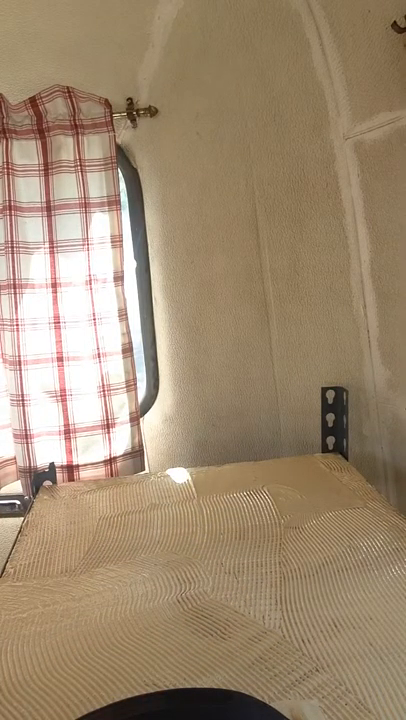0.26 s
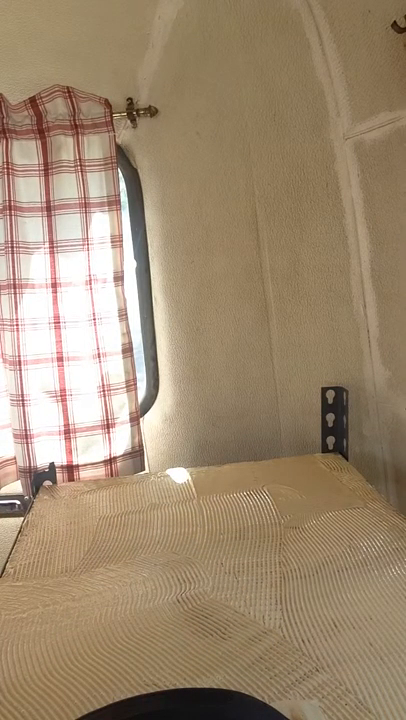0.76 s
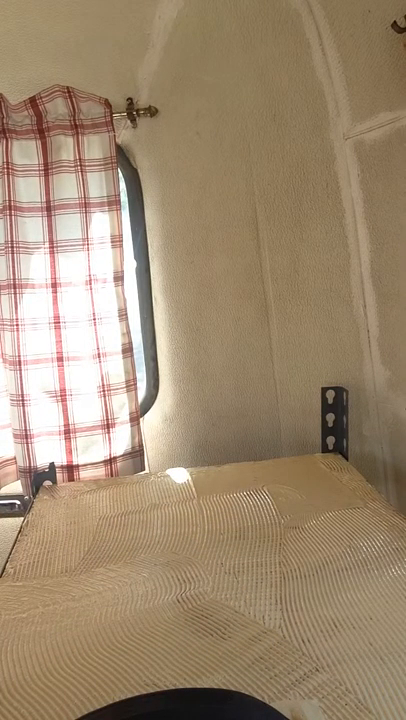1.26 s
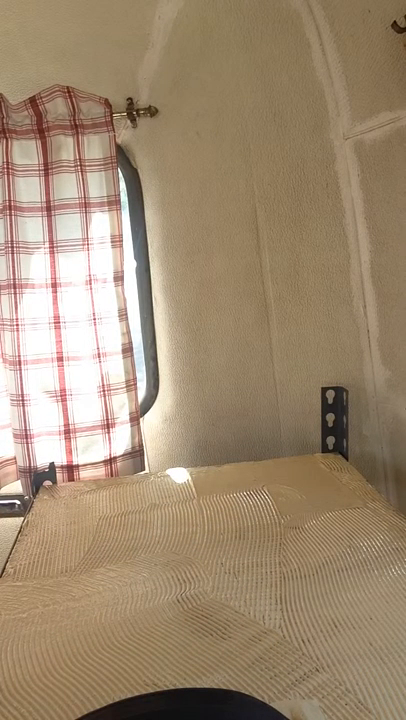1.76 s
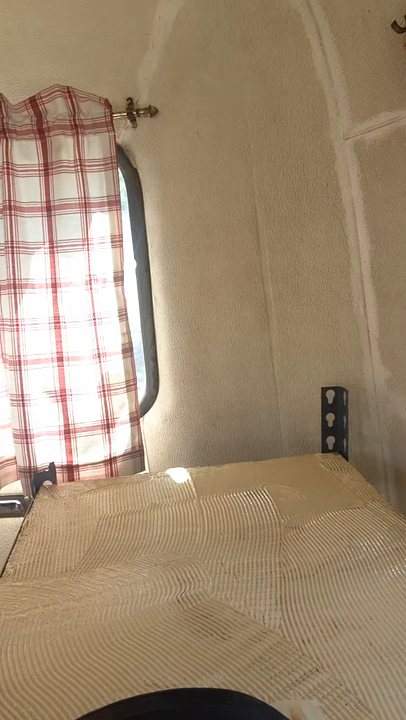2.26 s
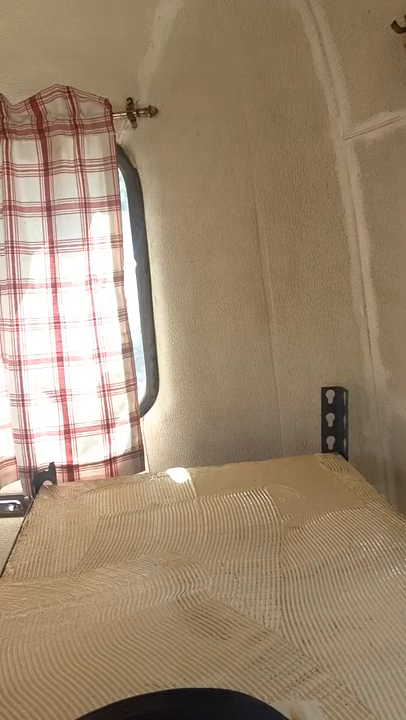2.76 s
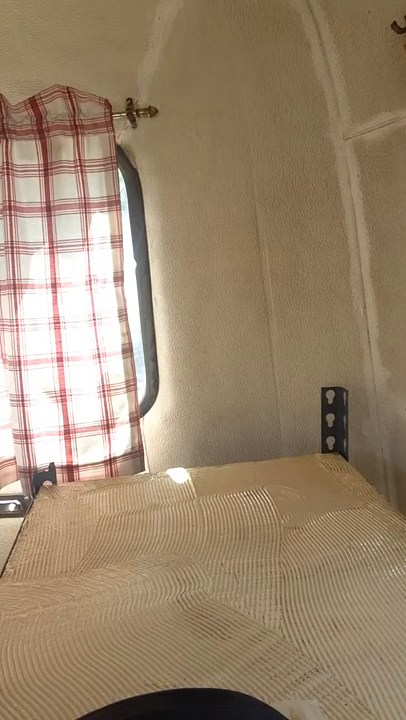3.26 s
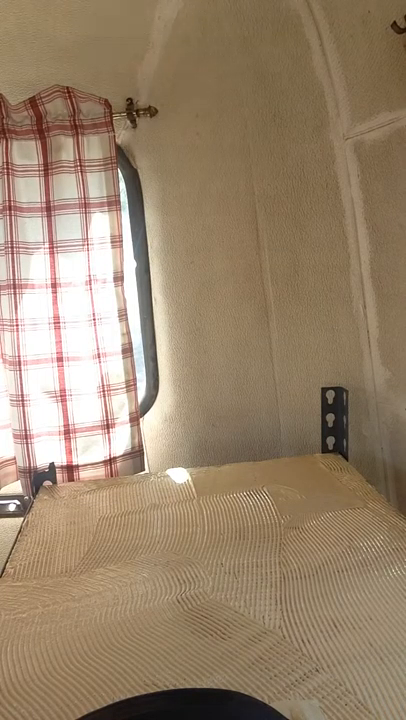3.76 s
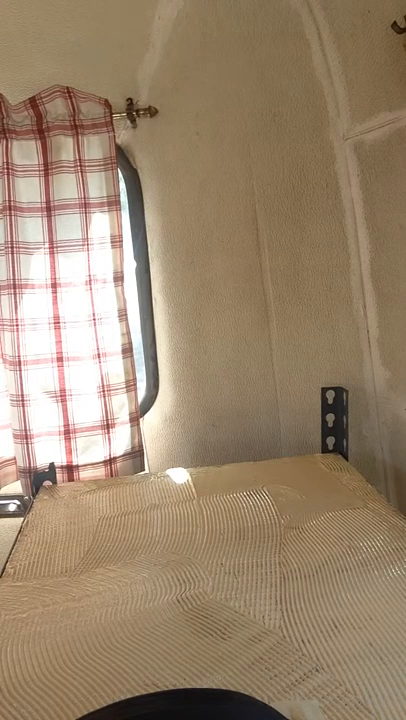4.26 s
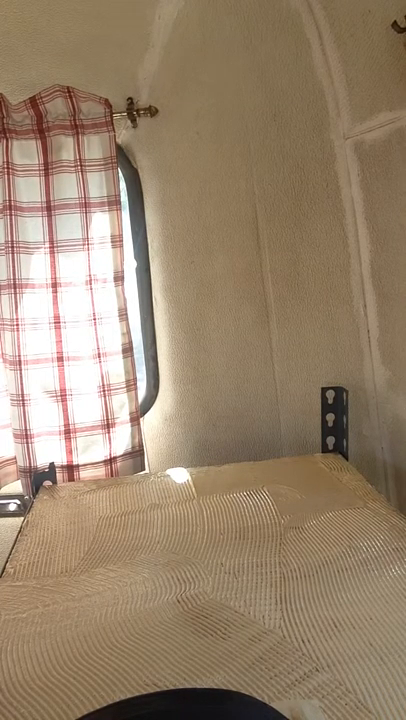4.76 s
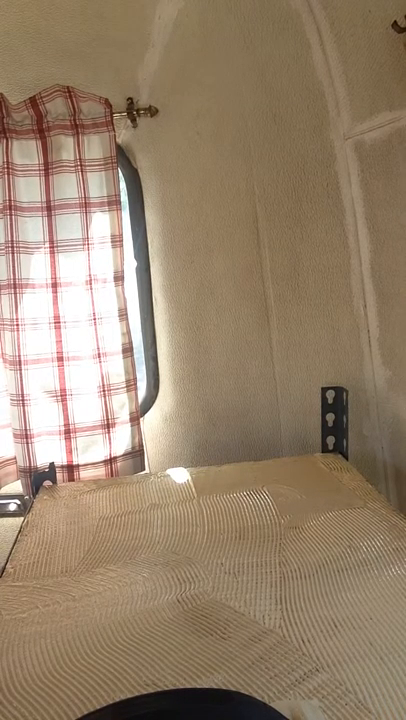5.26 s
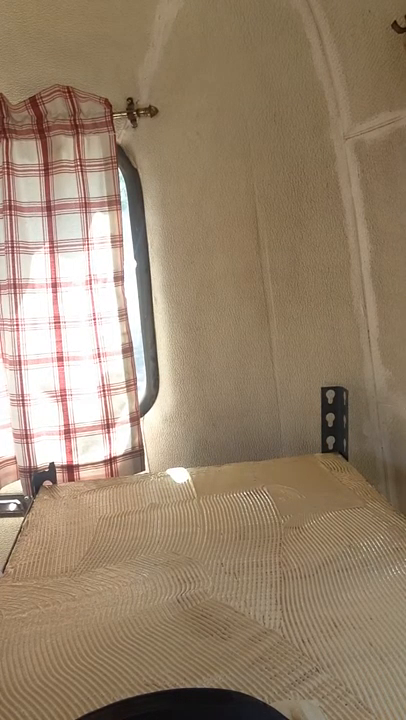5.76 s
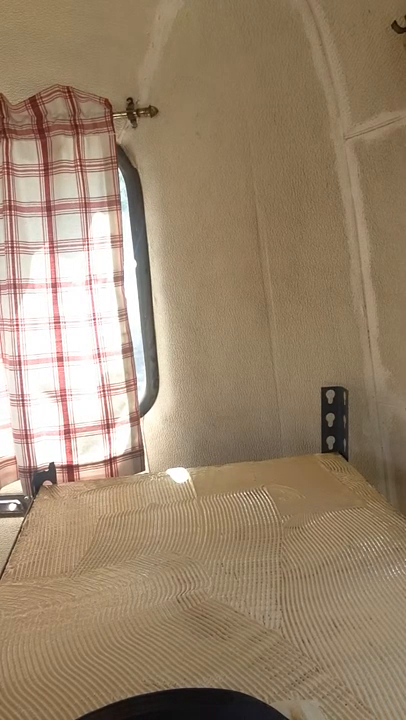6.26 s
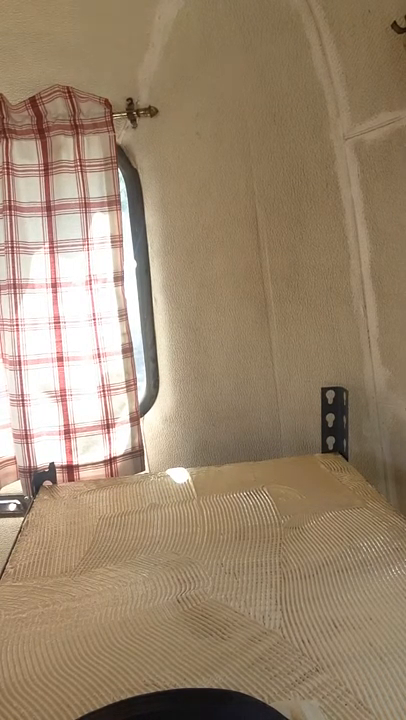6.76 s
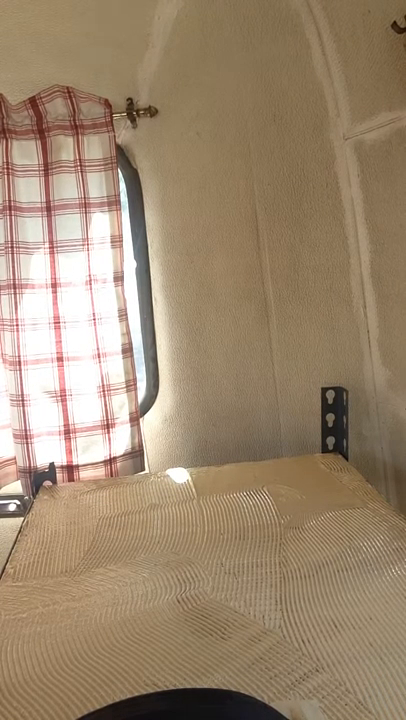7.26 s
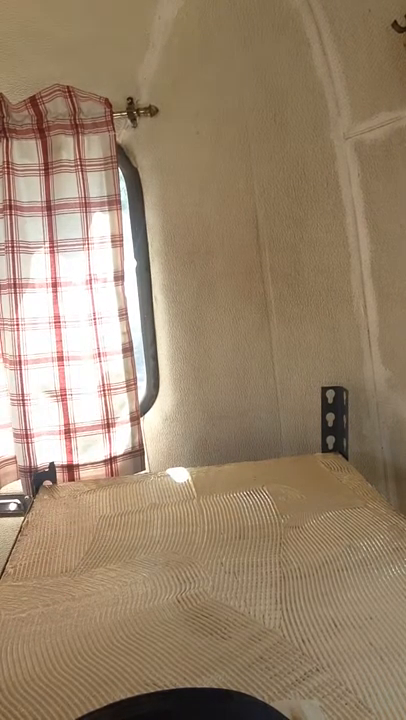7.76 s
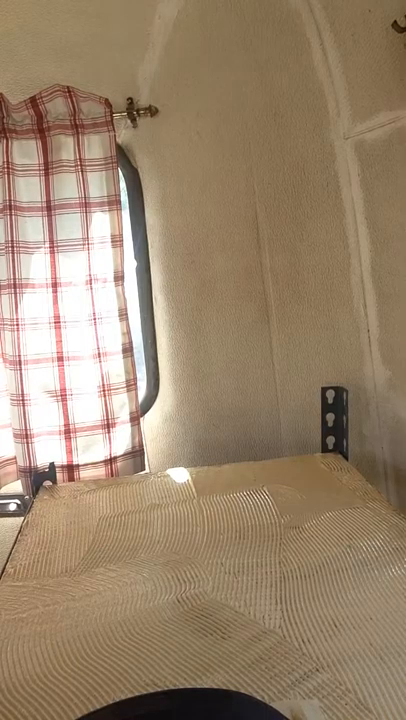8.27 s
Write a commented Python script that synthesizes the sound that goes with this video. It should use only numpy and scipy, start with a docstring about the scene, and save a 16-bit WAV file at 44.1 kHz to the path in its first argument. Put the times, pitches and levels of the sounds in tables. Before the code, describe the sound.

A faint appliance hum and a quiet rumble run throughout inside a small fibreglass cabin. At about 1.4 seconds a small steel part clicks down, followed by a dull double thump at 2 seconds and softer bumps. From 3.1 to 3.3 seconds a board is shoved into place close by, catching and letting go in a loud run of ringing knocks and hollow thuds. Soft rustling of cloth and hands continues from here, with brief scuffs. A thump lands at 4.3 seconds, a tiny tick at 4.6, light rasps around 5 to 6 and another bump at 5.6. The board is shoved again from 6.8 to 7 seconds, in a second loud clatter. A few softer thumps come around 7.5 seconds, then light rustling, and a very faint thin whine sets in at about 8.3 seconds.

```python
"""A board is shoved into place twice, catching and letting go in runs of ringing knocks.
Someone works close by in a small fibreglass cabin: knees and tools thump the floor and ring the shell,
cloth and hands rustle, scuff and rasp, and a small steel part clicks down. Underneath, an appliance
hums at twice the mains frequency over a quiet rumble; a faint whine sets in near the end."""
import sys
import numpy as np
from scipy import signal
from scipy.fft import rfft, irfft, next_fast_len
from scipy.io import wavfile
from scipy.ndimage import uniform_filter1d, map_coordinates

SR = 44100
rng = np.random.default_rng(int(sys.argv[2]) if len(sys.argv) > 2 else 0)


def store_pcm(level_fs):
    """Save levels as 16-bit WAV."""
    pcm = np.round(np.clip(level_fs, -1, 1) * 32767).astype(np.int16)
    wavfile.write(sys.argv[1], SR, np.atleast_2d(pcm).T)


N = 376173
TIME_S = np.arange(N) / SR


def amp(db):
    """Decibels to gain."""
    return 10 ** (np.asarray(db) / 20)


def unit(x):
    """Scale to rms 1."""
    return x / np.sqrt(np.mean(x ** 2) + 1e-20)


def spectrum(points):
    """Gain response through (Hz, dB) points on a log frequency axis."""
    hz, db = np.transpose(points)
    return lambda f: amp(np.interp(np.log(f + 1), np.log(hz + 1), db))


def resonances(modes):
    """Causal response of (Hz, width Hz, dB) modes, alternating in sign."""
    return lambda f: sum((-1) ** k * amp(db) * 1j * f * width / (hz * hz - f * f + 1j * f * width)
                         for k, (hz, width, db) in enumerate(modes))


def curves(rows):
    """One value per sample for each column after the time."""
    times_s, *columns = np.transpose(rows)
    return [np.interp(TIME_S, times_s, column) for column in columns]


def wobble(rate_hz):
    """Smooth random curve, rate_hz knots a second."""
    knots = rng.standard_normal(int(N * rate_hz / SR) + 4)
    return map_coordinates(knots, [TIME_S * rate_hz])


def filtered(x, response):
    """Apply a complex frequency response."""
    size = next_fast_len(len(x) + 8192)
    return irfft(rfft(x, size) * response(np.fft.rfftfreq(size, 1 / SR)), size)[:len(x)]


def noise(response, size=N):
    """Coloured noise of rms 1."""
    return unit(filtered(rng.standard_normal(size), response))


def patchy(x, depth_db):
    """Random gain patches across time and frequency."""
    bins = signal.stft(x, nperseg=512)[2]
    field = uniform_filter1d(uniform_filter1d(rng.standard_normal(bins.shape), 10, 0), 10, 1)
    return signal.istft(bins * amp(depth_db * unit(field)), nperseg=512)[1][:N]


def add(track, start_s, sound):
    """Mix a sound into the track."""
    start = round(start_s * SR)
    track[start:start + len(sound)] += sound[:len(track) - start]


# Cabin noise. Each row: frequency in Hz, relative density in dB.
RUMBLE_SPECTRUM = [(15, -41), (24, -16.5), (53, -4), (91, -4), (110, -2), (142, -6), (226, -14),
                   (322, -21.5), (400, -23), (754, -26), (1250, -30.5), (2100, -38), (3000, -42),
                   (8000, -46), (15400, -56)]
# Its drift. Each row: time in seconds, relative level in dB.
RUMBLE_LEVELS = [(0.0, -62.5), (2.54, -64.5), (3.32, -60), (3.66, -62), (5.87, -65.5), (7.6, -62),
                 (8.53, -62.5)]


def cabin_rumble():
    """Broad rumble and hiss, drifting in level."""
    level_db, = curves(RUMBLE_LEVELS)
    return amp(level_db + 6.5) * noise(spectrum(RUMBLE_SPECTRUM))


# Hum lines. Each row: frequency in Hz, mean rms level in dB, frequency wander in Hz.
HUM_LINES = [(120.3, -61, 4.6), (232.3, -77.5, 7.87), (359.7, -78, 1.98)]


def appliance_hum():
    """Three unsteady lines, the strongest at twice the mains frequency."""
    track = np.zeros(N)
    for hz, level_db, wander_hz in HUM_LINES:
        gain = np.sqrt(2) * amp(level_db + 3.5 * wobble(11))
        cycles = hz * TIME_S + np.cumsum(wander_hz * wobble(12)) / SR
        track += gain * np.sin(2 * np.pi * cycles)
    return track


def whine(start_s=8.32, hz=620, level_db=-78, wander_hz=6):
    """A thin, slightly wavering tone sets in."""
    onset = np.clip((TIME_S - start_s) / 0.022, 0, 1)
    gain = amp(level_db + 5.3 * wobble(15))
    cycles = hz * TIME_S + np.cumsum(wander_hz * wobble(15)) / SR
    return onset * gain * np.sin(2 * np.pi * cycles)


# Cloth friction, two bands. Each row: frequency in Hz, relative density in dB.
CLOTH_BODY = [(300, -3.5), (700, -4.5), (1300, -2.5), (1850, -2), (2200, -1.5), (2600, -5), (3300, -6),
              (4500, -10), (6000, -14), (15400, -26.5)]
CLOTH_TREBLE = [(2500, -2.5), (4000, -1.5), (6000, -1.5), (8000, -3), (9500, -7.5), (13000, -8.5),
                (15400, -13)]
# Cloth and hands sliding. Each row: time in seconds, body level in dB, treble in dB re body.
RUSTLE_LEVELS = [(2.6, -96.5, -4), (3.09, -63, 4), (3.24, -52.5, -1), (3.52, -61.5, 2.5), (3.72, -78, 4.5),
                 (3.85, -71.5, 2), (3.94, -57, 2), (4.2, -64.5, 4), (4.55, -56.5, 2), (4.65, -57, 3.5),
                 (4.7, -63.5, 5.5), (4.91, -62, 1.5), (5.04, -61, 5), (5.11, -65.5, -2),
                 (5.25, -60.5, -0.5), (5.44, -59.5, -9), (5.52, -67.5, -0.5), (5.72, -69.5, -1.5),
                 (5.82, -66.5, 5), (6.28, -69, 5.5), (6.38, -77, 6), (6.55, -65.5, -0.5),
                 (6.79, -57.5, 2.5), (6.93, -58, -2), (7.17, -66.5, 4), (7.31, -58, 7.5),
                 (7.37, -75.5, 1.5), (7.85, -67.5, -6), (8.0, -67, -5), (8.21, -70.5, 6), (8.53, -69.5, 2)]


def rustle():
    """Fibres slip over each other: fine noise that flickers and changes colour as folds catch."""
    level_db, treble_db = curves(RUSTLE_LEVELS)
    onset = np.clip((TIME_S - RUSTLE_LEVELS[0][0]) / 0.083, 0, 1)
    catch = amp(wobble(45) + 0.82 * wobble(300))
    body = unit(catch * patchy(noise(spectrum(CLOTH_BODY)), depth_db=2.0))
    treble = unit(catch * patchy(noise(spectrum(CLOTH_TREBLE)), depth_db=1.5))
    return onset * amp(level_db) * (body + amp(treble_db) * treble)


# Brief rubs. Each row: start in seconds, body level in dB, treble in dB re body, length in seconds.
SCUFF_STROKES = [(1.312, -71, -4, 0.014), (1.683, -67.5, -12, 0.017), (1.968, -61.5, -4, 0.027),
                 (2.01, -56.5, 0, 0.0083), (2.175, -69.5, -8, 0.032), (2.699, -68.5, -11, 0.034),
                 (2.898, -71, 2, 0.0098), (3.428, -53.5, -0.5, 0.048), (3.588, -63, 5, 0.037),
                 (3.757, -66, -1, .03), (4.475, -51, 0, 0.024), (4.723, -59.5, 6, 0.044),
                 (5.152, -54.5, -4, 0.046), (5.557, -61.5, -2.5, 0.071), (6.45, -62.5, 3, 0.042),
                 (6.508, -63.5, 10, 0.028), (7.079, -62, 5, 0.028), (7.23, -62, 7.5, 0.04),
                 (7.695, -64, 11, 0.013), (7.899, -60, -25, .15), (8.107, -64.5, 5, 0.068),
                 (8.341, -62, 8, 0.012)]


def scuffs(t60_s=0.12):
    """A sole or sleeve rubs: cloth noise swells, holds and fades into the cabin."""
    track, size = np.zeros(N), SR // 4
    t = TIME_S[:size]
    for start_s, level_db, treble_db, length_s in SCUFF_STROKES:
        swell = 1 - np.exp(-t / (0.12 * length_s))
        fade = amp(-60 * np.maximum(t - length_s, 0) / t60_s)
        body = noise(spectrum(CLOTH_BODY), size)
        treble = noise(spectrum(CLOTH_TREBLE), size)
        add(track, start_s, amp(level_db) * swell * fade * (body + amp(treble_db) * treble))
    return track


# Singing rubs. Each row: start in seconds, length in seconds, resonance in Hz, level in dB.
RASP_STROKES = [(4.99, 0.075, 2850, -57), (4.975, 0.081, 2150, -59), (5.4, 0.089, 2030, -63),
                (5.76, 0.59, 2100, -71.5)]


def rasps(width_hz=230):
    """Friction noise through one resonance of the rubbed surface, swelling and fading."""
    track = np.zeros(N)
    for start_s, length_s, hz, level_db in RASP_STROKES:
        size = round(length_s * SR)
        band = noise(resonances([(hz, width_hz, 0)]), size)
        add(track, start_s, amp(level_db) * np.hanning(size) ** 0.5 * band)
    return track


def tick(start_s=4.5788, level_db=-34, hz=1300, t60_s=0.006):
    """A tiny hard contact: one damped sine, gone at once."""
    track, t = np.zeros(N), TIME_S[:SR // 50]
    add(track, start_s, amp(level_db - 60 * t / t60_s) * np.sin(2 * np.pi * hz * t))
    return track


# Hard contact noise, for steel and board. Each row: frequency in Hz, relative density in dB.
CRACK_SPECTRUM = [(500, -2.5), (1500, 1), (3000, -1), (5000, -4.5), (8000, -11), (11000, -18.5),
                  (15400, -27)]
# Steel part. Each row: mode frequency in Hz, width in Hz, gain in dB.
STEEL_MODES = [(660, 55, -1.5), (1726, 84, 2), (4190, 110, 0.5), (4700, 240, -4), (5760, 1200, -13)]
# Its landing. Each row: time in seconds, relative level in dB.
STEEL_LANDINGS = [(1.4057, -31.5)]


def steel_click(ring_t60_s=0.12):
    """The steel part lands and rattles briefly in its broad modes over a bright crack."""
    track, size = np.zeros(N), SR // 4
    t = TIME_S[:size]
    attack = 1 - np.exp(-t / 0.00061)
    crack_decay = amp(-60 * t / 0.037) + amp(-7.5 - 60 * t / 0.16)
    for time_s, level_db in STEEL_LANDINGS:
        ring = amp(-60 * t / ring_t60_s) * noise(resonances(STEEL_MODES), size)
        crack = noise(lambda hz: spectrum(CRACK_SPECTRUM)(hz) ** 0.48, size)  # flatter, so brighter
        add(track, time_s - 0.001, amp(level_db - 6.5) * attack * (ring + 0.54 * crack_decay * crack))
    return track


# Cabin floor and shell. Each row: mode frequency in Hz, relative gain in dB.
SHELL_MODES = [(58, -1), (74, 6), (92, -2), (112, 5.5), (150, -1.5), (175, 1), (203, -1), (232, -4.5),
               (272, -1.5), (312, -1.5), (360, -3.5), (406, -3), (451, -2), (544, -1.5), (606, 0),
               (665, -6), (714, 0), (790, 1), (880, 4)]
# Soft blows. Each row: time in seconds, relative level in dB, centre in Hz, spread in octaves.
FLOOR_BLOWS = [(1.406, -35, 177, .7), (1.408, -46.5, 636, 0.31), (1.672, -50.5, 716, .16),
               (1.972, -43.5, 557, 0.18), (2.012, -28, 260, 0.69), (2.04, -29, 193, 0.77),
               (2.71, -57, 380, .3), (2.755, -44, 226, 0.46), (2.866, -38, 160, 0.36),
               (3.074, -34.5, 320, .57), (3.158, -37.5, 450, 0.74), (3.196, -19.5, 300, 1.1),
               (3.213, -19.5, 290, 0.94), (3.241, -21.5, 336, 0.51), (3.264, -20.5, 382, 0.77),
               (3.292, -23.5, 115, 0.25), (3.33, -36, 304, 0.28), (3.451, -27.5, 174, 0.65),
               (3.46, -43, 790, 0.54), (4.263, -23.5, 191, 0.8), (4.299, -32, 175, 0.73),
               (4.40, -38.5, 215, 0.17), (4.849, -39.5, 121, 0.24), (5.596, -38.5, 300, 0.54),
               (5.617, -30, 117, 0.39), (5.896, -40.5, 115, 0.3), (6.811, -28, 436, 0.56),
               (6.824, -21.5, 167, 0.51), (6.859, -25.5, 504, 0.7), (6.885, -21, 232, 0.29),
               (6.912, -22, 398, 1.9), (6.93, -19.5, 270, 0.75), (6.959, -21.5, 85, 0.54),
               (6.979, -26.5, 234, 0.72), (7.06, -45.5, 284, 0.28), (7.489, -27.5, 148, 0.95),
               (7.53, -34.5, 262, .53), (7.616, -30, 194, 0.54), (7.78, -38, 92, 0.4),
               (8.11, -34.5, 70, .26)]


def floor_thumps(centre_t60_s=0.21):
    """Each blow rings the shell modes near a centre set by where and how softly it lands."""
    track, t = np.zeros(N), TIME_S[:SR // 3]
    hz, mode_db = np.transpose(SHELL_MODES)[:, :, None]
    attack = 1 - np.exp(-t / 0.0066)
    for time_s, level_db, centre_hz, spread_oct in FLOOR_BLOWS:
        gain_jitter, tune_jitter = rng.standard_normal((2, len(SHELL_MODES), 1))
        excitation = np.exp(-(np.log2(hz / centre_hz) / spread_oct) ** 2 / 2)
        strength = amp(mode_db + 1.6 * gain_jitter) * excitation
        t60_s = centre_t60_s * (hz / centre_hz) ** -0.4  # higher modes die sooner
        phase = 2 * np.pi * hz * (1 + 0.015 * tune_jitter) * t + 1.31 * tune_jitter
        ring = (strength * amp(-60 * t / t60_s) * np.sin(phase)).sum(0) / np.linalg.norm(strength)
        add(track, time_s - 0.003, amp(level_db - 2.0) * attack * ring)
    return track


# Board. Each row: mode frequency in Hz, width in Hz, gain in dB.
BOARD_MODES = [(1100, 75, -0.5), (1330, 120, -5.5), (1707, 140, -1), (2090, 110, -0.5), (2230, 64, -0.5),
               (2806, 150, -9.5)]
# Hard contacts. Each row: time in seconds, relative level in dB, relative board ring in dB.
BOARD_CONTACTS = [(3.0751, -36, 5.5), (3.1355, -46, 6), (3.146, -42, -6), (3.156, -30.5, -12),
                  (3.189, -30, -8), (3.1966, -25.5, -12), (3.2128, -29.5, 7), (3.2211, -27, -2),
                  (3.241, -29, 5.5), (3.2512, -34, -3), (3.2649, -26.5, 8), (3.2714, -31, 3.5),
                  (3.299, -38, -8), (6.5222, -47, -19), (6.814, -26.5, -18), (6.8296, -29, -2),
                  (6.846, -35, -4), (6.8604, -29.5, 5.5), (6.8751, -30, 1), (6.8935, -36, 8.5),
                  (6.904, -37, 7), (6.9118, -25, 7.5), (6.9239, -26, 3), (6.9344, -31, 6), (6.955, -37, 12),
                  (6.9786, -42, -2), (7.6983, -38.5, -14)]


def board_knocks(early_t60_s=0.09, late_t60_s=0.28):
    """Each contact cracks and strikes the board's modes; close walls smear both into a short tail."""
    track, size = np.zeros(N), SR // 5
    t = TIME_S[:size]
    chatter = unit(amp(1.42 * wobble(220)))  # the sliding board catches and lets go
    struck = filtered(signal.unit_impulse(size), resonances(BOARD_MODES))
    struck /= np.abs(struck).max()
    attack = 1 - np.exp(-t / 0.0031)
    decay = amp(-60 * t / early_t60_s) + amp(-7.5 - 60 * t / late_t60_s)
    for time_s, level_db, ring_db in BOARD_CONTACTS:
        crack = noise(spectrum(CRACK_SPECTRUM), size)
        diffuse_ring = amp(ring_db - 6.5) * noise(resonances(BOARD_MODES), size)
        direct_ring = amp(ring_db + 6) * rng.choice([-1, 1]) * struck
        knock = direct_ring + attack * decay * (crack + diffuse_ring)
        add(track, time_s - 0.0015, amp(level_db - 7.0) * knock)
    return track * chatter


def scene():
    """All sources, summed to mono."""
    background = appliance_hum() + cabin_rumble() + whine()
    friction = rustle() + scuffs() + rasps()
    impacts = floor_thumps() + board_knocks() + steel_click() + tick()
    return (background + friction + impacts)[None]


CUTOFF_HZ = 15500


def record(dry):
    """Brick-wall low-pass."""
    return filtered(dry[0], lambda hz: hz < CUTOFF_HZ)[None]


dry = scene()
out = record(dry)
store_pcm(out)
```